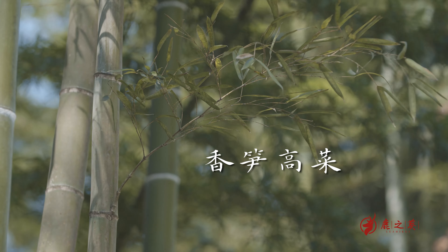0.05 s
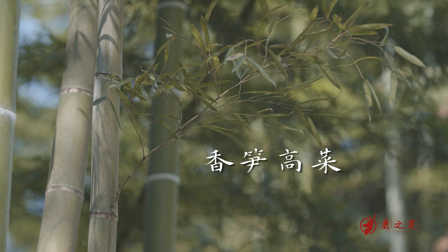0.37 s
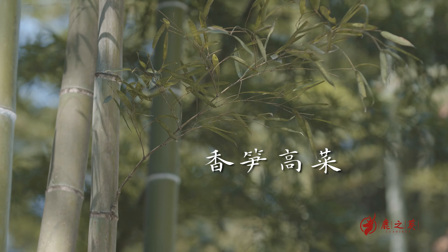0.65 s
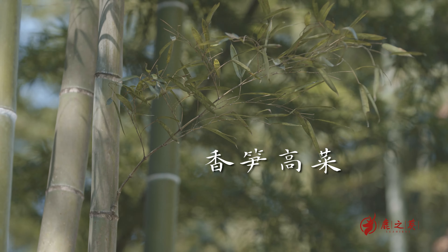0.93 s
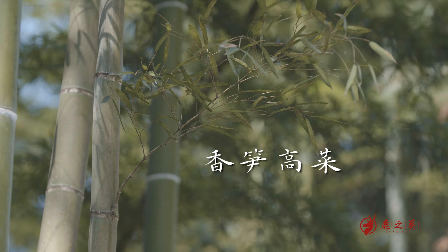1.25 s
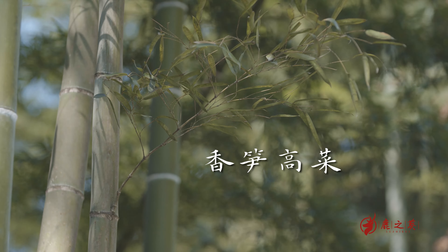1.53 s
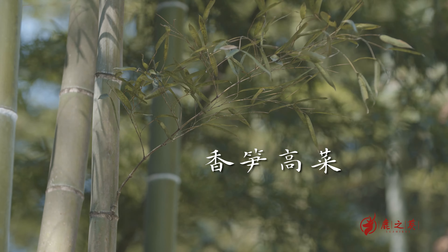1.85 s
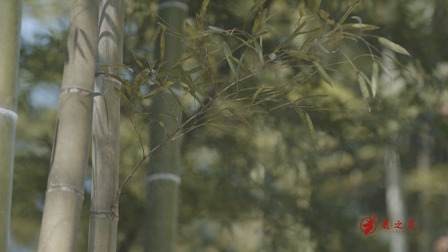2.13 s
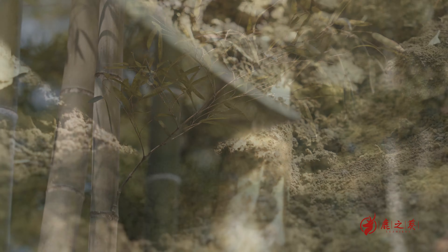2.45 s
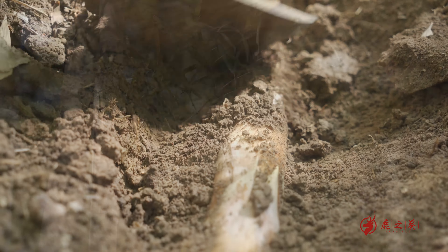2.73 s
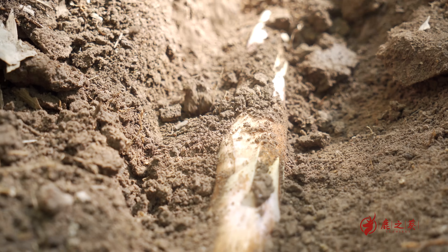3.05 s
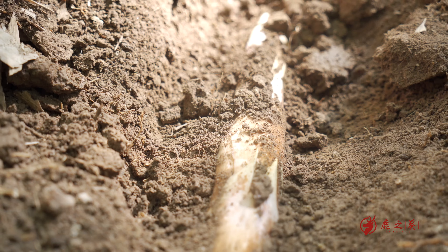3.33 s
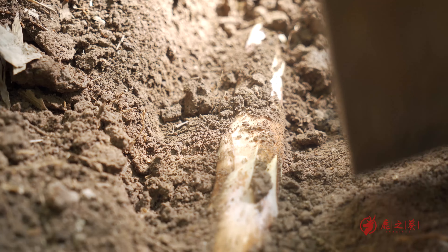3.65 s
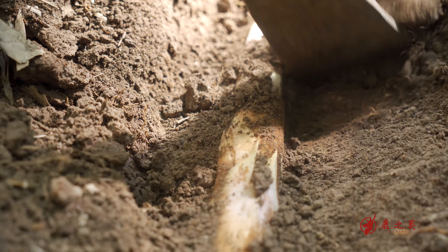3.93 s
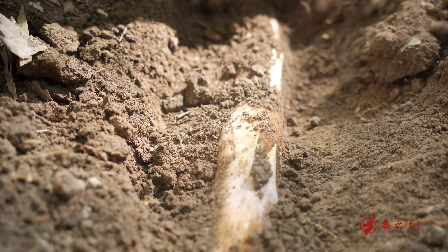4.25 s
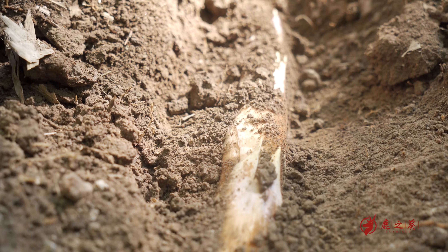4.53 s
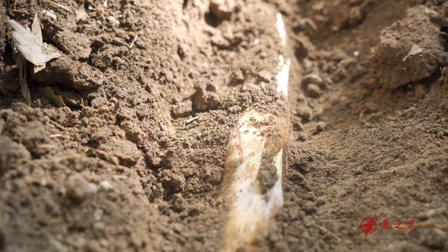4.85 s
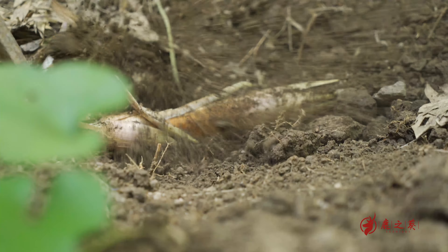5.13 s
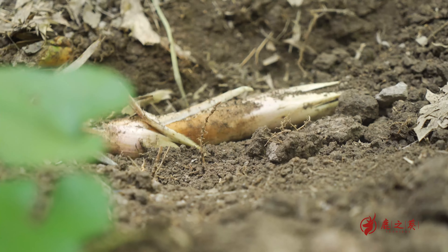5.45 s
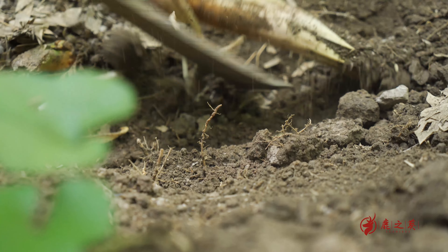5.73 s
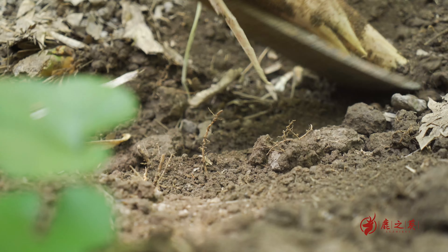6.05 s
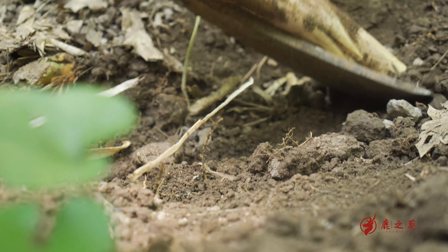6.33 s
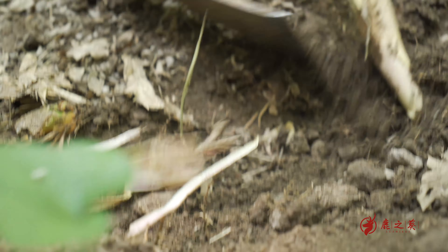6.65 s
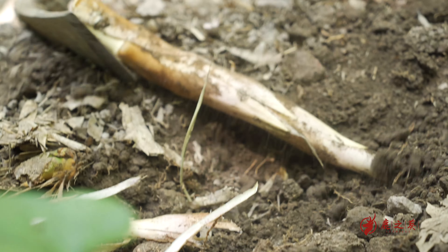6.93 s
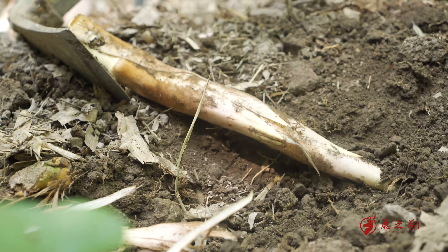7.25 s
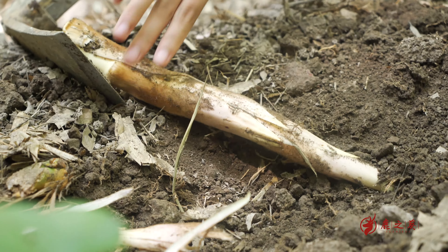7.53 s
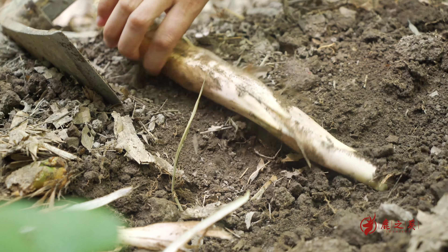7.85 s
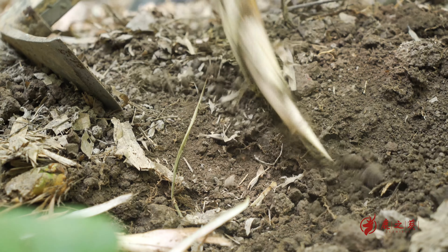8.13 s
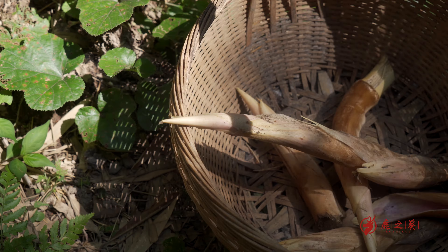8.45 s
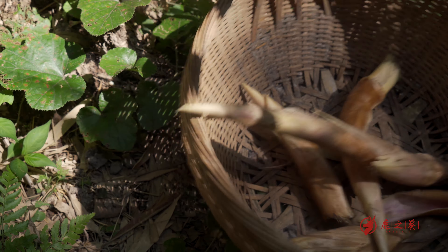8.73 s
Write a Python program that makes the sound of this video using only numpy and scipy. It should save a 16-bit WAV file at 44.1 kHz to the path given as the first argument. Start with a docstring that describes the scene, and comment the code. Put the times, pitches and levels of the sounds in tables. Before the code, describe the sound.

Close, dry digging with a hoe, with sharp crunches, a root snapping and a wicker crackle, under echoing birdsong.

```python
"""Bamboo grove: a shoot is dug up close by, over a low murmur of air and a hiss of leaves.
Songbirds whistle and twitter in near-pure tones; the stems scatter them into echoes.
A steel hoe scrapes and chops crumbly soil: runs of tiny fractures ring the blade.
The shoot snaps off its root, sheds crumbs, knocks on the blade and drops into a wicker basket."""
import sys
import numpy as np
from scipy import signal
from scipy.fft import rfft, irfft, next_fast_len
from scipy.io import wavfile
from scipy.ndimage import uniform_filter1d, map_coordinates

SR = 44100
rng = np.random.default_rng(int(sys.argv[2]) if len(sys.argv) > 2 else 0)


def wrap_up_sound(samples):
    """Save the sound to the file named by the first command line argument, as 16-bit audio."""
    columns = np.atleast_2d(samples).T
    # keep every value between -1 and 1, then stretch to whole-number steps
    tamed = np.clip(columns, -1, 1)
    steps = np.round(tamed * 32767).astype(np.int16)
    wavfile.write(sys.argv[1], SR, steps)


N = 391608

# noise spectra: f/Hz, relative density/dB
MURMUR_SPECTRUM = [(15, -33), (25, -16), (109, -3), (186, -4.5), (225, -3), (262, -5), (384, -5.5),
                   (655, -8.5), (707, -8.5), (2400, -18.5), (3120, -30), (5280, -120)]
LEAF_SPECTRUM = [(100, -38.5), (1000, -14.5), (2500, 6), (5000, -2.5), (8000, -7.5), (12000, -17),
                 (16000, -23.5)]
FIZZ_SPECTRUM = [(3000, -38), (5000, -12), (7600, -10), (8600, -1), (9800, -11.5), (13000, -12),
                 (16000, -15)]
SOIL_SPECTRUM = [(60, -6), (250, -2), (600, -2), (2000, 3.5), (4000, -1.5), (8000, -5.5), (11000, -11.5),
                 (16000, -13)]
# background envelopes: t/s, relative level/dB
MURMUR_LEVELS = [(0.0, -64.5), (2.15, -56), (8.87, -57)]
LEAF_LEVELS = [(0, -72), (.6, -67), (1.5, -66), (2.1, -63), (2.4, -56), (4.7, -59.5), (5.9, -59.5),
               (7.2, -57.5), (8.88, -63)]
# long whistles: t/s, length/s, first f/Hz, middle f/Hz, last f/Hz, held level/dB
WHISTLES = [(1.571, 0.2596, 3235, 3152, 3127, -46.5), (3.6, 0.41, 3310, 3229, 3160, -50.5),
            (3.875, .33, 3090, 2990, 3100, -53), (4.259, 0.367, 3701, 3610, 3600, -49.5),
            (6.881, .335, 3120, 2987, 2917, -42.5), (7.463, .365, 3556, 3752, 3760, -42)]
# short held notes: t/s, length/s, f/Hz, level/dB
PIPS = [(-.03, .11, 3220, -54.5), (0.378, 0.085, 2945, -51.5), (0.579, 0.069, 3360, -59),
        (0.628, .086, 3675, -54.5), (.93, .08, 3300, -63), (1.009, 0.088, 3740, -59),
        (1.829, 0.094, 3123, -52.5), (2.111, 0.16, 2563, -45.5), (4.765, 0.12, 3660, -50.5),
        (4.887, .076, 2967, -49.5), (4.967, 0.14, 3299, -53), (7.328, 0.15, 2369, -56),
        (7.451, 0.087, 3115, -50), (7.539, 0.083, 2805, -49.5), (7.634, .075, 2395, -53),
        (7.677, 0.0393, 2020, -59), (8.007, .05, 5410, -65), (8.095, 0.065, 4767, -57),
        (8.149, .1, 4184, -49.5)]
# quick sweeps: t/s, length/s, first f/Hz, last f/Hz, level/dB
SLURS = [(.178, 0.036, 2170, 4100, -57.5), (.217, 0.07, 4400, 2240, -54.5), (0.28, .093, 3620, 3327, -60.5),
         (0.349, 0.035, 2310, 3005, -51.5), (.54, 0.02, 5550, 5050, -71), (.544, .02, 3957, 3650, -64.5),
         (0.727, .02, 5550, 5100, -69), (.731, 0.031, 2380, 3435, -57), (1.921, 0.079, 3200, 2930, -47.5),
         (1.975, 0.041, 3050, 2330, -47), (2.013, 0.082, 3200, 3840, -57), (2.302, .067, 3080, 2950, -54),
         (4.677, .071, 3220, 4208, -50), (4.726, 0.065, 4400, 3970, -48.5),
         (7.068, 0.128, 4200, 3700, -62.5), (7.96, 0.041, 3300, 4950, -53.5),
         (8.429, 0.041, 3870, 3340, -57.5)]
# stock calls: (length/s, first f/Hz, middle f/Hz, last f/Hz), repeats (t/s, level/dB)
TSIP, TSIPS = (.034, 5400, 6050, 6200), [(7.14, -65), (7.6, -63), (8.352, -61)]
ARCH, ARCHES = (0.0455, 2100, 3110, 2490), [(8.483, -54.5), (8.656, -56), (8.828, -55.5)]
# twitter spells: start t/s, end t/s, low f/Hz, high f/Hz, relative level/dB
TWITTERS = [(0.201, 1.1, 2740, 3683, -66.5), (7.197, 8.3, 2262, 3202, -60), (7.953, 8.45, 4400, 5540, -69)]
# echo decay, stems near the birds and far off: f/Hz, t60/s
NEAR_STEMS = [(300, .1), (3000, 0.11), (14000, 0.033)]
FAR_STEMS = [(300, 0.43), (3000, 3.3), (6000, 0.38), (14000, 0.63)]
# blade strokes: t/s, push/s, settling to -20 dB/s, peak/dB, build-up/dB, grit over crunch/dB
STROKES = [(2.16, .1, 0.3, -60, 6, 5.5), (2.52, 0.35, 0.1363, -48, 5.5, -0.5),
           (2.92, 0.1646, 0.1, -42.5, 11.5, 0), (3.169, 0.027, 0.28, -45.5, 15, 1.5),
           (3.55, 0.04, 0.2, -51, 2, 1), (3.78, 0.14, 0.25, -41, 15, -3), (4.15, 0.05, 0.22, -43, 15, 1.5),
           (4.29, 0.14, 0.27, -49, 9, -4.5), (4.83, .02, 0.37, -56.5, 2.5, 2.5),
           (5.085, 0.034, 0.76, -57, -4.5, 2), (5.6, 0.265, .04, -53, 8.5, 3),
           (6, 0.14, 0.33, -48, 4.5, 0.5), (6.505, 0.046, 0.15, -49, 6, -2.5),
           (6.73, 0.024, 0.6, -62.5, -7, 3.5), (6.93, 0.0275, 0.05, -55.5, 9, 2)]
# thud, crunch and grit bands: low f/Hz, high f/Hz
BURST_BANDS = [(200, 1200), (1200, 4500), (4500, 15500)]
# fracture bursts: t/s, length/s, thud level/dB, crunch level/dB, grit level/dB
CLOD_CHOPS = [(2.236, 0.0319, -48.5, -56, -37), (2.432, 0.0086, -46, -41, -41.5),
              (2.515, 0.0193, -54, -44, -42.5), (2.57, 0.0084, -37, -38.5, -43),
              (2.591, 0.0073, -37, -40.5, -37.5), (2.695, 0.0067, -55, -42.5, -57),
              (2.79, 0.0183, -45, -41, -41.5), (2.832, .008, -48.5, -37, -42),
              (2.86, 0.0096, -38.5, -40, -31), (3.018, 0.019, -50, -37.5, -46),
              (3.0825, .0027, -36, -16.5, -28.5), (3.087, 0.0031, -33, -20.5, -27),
              (3.13, 0.0034, -33, -40, -45), (3.136, 0.00524, -37, -27.5, -36.5),
              (3.16, 0.0081, -53, -48, -34), (3.206, 0.0075, -40.5, -36, -35.5),
              (3.55, 0.01065, -39.5, -46, -34), (3.604, 0.011, -36.5, -52, -36.5),
              (3.743, .0044, -41, -35.5, -35), (3.793, 0.005, -49, -42, -47),
              (3.89, 0.015, -40.5, -31.5, -35.5), (4.029, 0.0072, -45, -35.5, -42.5),
              (4.222, .009, -47, -36, -33.5), (4.27, 0.0135, -47.5, -41.5, -33.5),
              (4.363, .0023, -37, -27.5, -32), (4.3745, 0.0037, -41.5, -23.5, -29),
              (4.411, 0.0311, -47.5, -42, -38), (4.488, 0.0082, -46.5, -51, -61),
              (4.524, 0.0059, -43.5, -36.5, -47), (4.826, 0.0099, -45, -43, -36),
              (4.936, 0.018, -57, -59, -48), (6.016, 0.0089, -54, -44.5, -39.5),
              (6.15, 0.0213, -63, -39, -49), (6.24, 0.025, -54, -49, -61), (6.507, 0.035, -56, -44, -62.5),
              (6.951, 0.019, -49.5, -41, -51.5)]
ROOT_SNAP = [(5.07, 0.0084, -33, -26, -22.5), (5.0795, 0.0026, -31, -16, -47)]
SHOOT_KNOCKS = [(5.247, 0.0043, -46.5, -35.5, -64), (5.256, 0.0047, -42, -36.5, -60.5),
                (5.414, 0.0047, -68, -37.5, -46.5), (5.422, 0.013, -67.5, -42, -58),
                (5.563, 0.01, -50, -28, -49.5), (5.604, 0.0056, -55, -44.5, -53.5),
                (5.864, 0.0068, -51.5, -26.5, -40.5), (5.871, 0.0123, -41.5, -39, -53),
                (6.399, 0.012, -51.5, -47.5, -62), (6.425, 0.0031, -50, -38, -55),
                (6.777, 0.0072, -69.5, -45, -61.5)]
BASKET_CRUNCHES = [(8.676, 0.0032, -80, -47.5, -59), (8.768, 0.0056, -51, -49, -40),
                   (8.7725, 0.0027, -50, -31.5, -31.5), (8.778, 0.0209, -49, -44, -43),
                   (8.8125, 0.0089, -37.5, -36, -30.5), (8.8225, 0.00085, -32, -19.5, -23),
                   (8.825, 0.0098, -43, -52, -42), (8.84, 0.012, -55, -49, -48)]
# body resonances: nominal f/Hz, width/Hz, nominal gain/dB
HOE_MODES = [(720, 110, 0), (1230, 70, 0), (1570, 70, 3), (2020, 90, 3), (2340, 110, 2), (3300, 160, 4),
             (4010, 130, 5), (5600, 200, 10), (6080, 100, 2), (6810, 80, 3), (7290, 90, 3), (7780, 80, 3),
             (9420, 90, 6), (10170, 90, 15), (12100, 180, 8), (13300, 160, 6), (14200, 100, 7)]
ROOT_MODES = [(1860, 420, 7.5), (3170, 254, 14.4), (5400, 157, 3.2), (6730, 255, 6.8)]
SHOOT_MODES = [(1290, 110, 4), (1730, 100, 18), (2150, 200, 4), (3310, 160, 13), (5400, 180, 8),
               (6830, 160, 7), (10250, 250, 3)]
WICKER_MODES = [(750, 190, 1.6), (1320, 186, 4.2), (1820, 66, 4.1), (2894, 570, 8.4), (4020, 270, 2.9)]
# blade springs free: t/s, base level/dB, pitch ratio, tilt/(dB/octave)
CLANGS = [(2.241, -48.5, 1.02, 3.5), (3.55, -48, 1.055, 2.5), (3.604, -44.5, 1, -0.5),
          (4.828, -50, 1.08, 1), (6.507, -47, 1.003, 0.5), (6.742, -56.5, 1.23, 3.5),
          (6.951, -55, 1.01, -1)]
# free blade modes: nominal f/Hz, relative level/dB, t60/s
FREE_BLADE_MODES = [(1215, 9, 0.16), (2270, 0.5, .22), (4700, 1.5, 0.27), (5700, -16, 0.093),
                    (6200, -3, 0.154), (7780, -4.5, 0.44), (9300, -7.5, 0.44), (11920, -12, 0.44)]


def amp(db):
    """dB to gain."""
    return 10 ** (np.asarray(db) / 20)


def unit(x):
    """Scale to rms 1."""
    return x / np.sqrt(np.mean(x ** 2) + 1e-20)


def along(points, hz):
    """Interpolate (f/Hz, value) points over log f."""
    f, v = np.transpose(points)
    return np.interp(np.log(hz + 1), np.log(f + 1), v)


def curve(points):
    """Interpolate (t/s, value) points per sample."""
    return np.interp(np.arange(N) / SR, *np.transpose(points))


def gate(start_s, end_s, fade_s):
    """1 from start to end, linear fades."""
    t = np.arange(N) / SR
    return np.clip(np.minimum(t - start_s, end_s - t) / fade_s + .5, 0, 1)


def wobble(rate_hz, size=N):
    """Smooth curve through random knots."""
    knots = rng.standard_normal(int(size * rate_hz / SR) + 4)
    return map_coordinates(knots, [np.arange(size) * rate_hz / SR])


def add(track, at_s, x):
    """Mix x into the track."""
    i = round(at_s * SR)
    x = x[max(-i, 0):max(N - i, 0)]
    track[max(i, 0):][:len(x)] += x


def filtered(x, response):
    """FFT filter, gain = response(f/Hz)."""
    size = next_fast_len(len(x) + 4096)
    return irfft(rfft(x, size) * response(np.fft.rfftfreq(size, 1 / SR)), size)[:len(x)]


def coloured(x, spectrum):
    """Shape by a spectrum, rms 1."""
    return unit(filtered(x, lambda hz: amp(along(spectrum, hz))))


def band(x, edges_hz):
    """Causal band-pass."""
    return signal.sosfilt(signal.butter(3, edges_hz, 'band', fs=SR, output='sos'), x)


def air():
    """Low murmur and faint leaf hiss; a thin high fizz sets in with the digging."""
    murmur = coloured(rng.standard_normal(N), MURMUR_SPECTRUM)
    murmur *= amp(curve(MURMUR_LEVELS) + 1.5 + 0.51 * wobble(3.78))
    leaves = coloured(rng.standard_normal(N), LEAF_SPECTRUM)
    leaves *= amp(curve(LEAF_LEVELS) + 1.1 * wobble(1.906))
    fizz = coloured(rng.standard_normal(N), FIZZ_SPECTRUM) * amp(-66.5) * gate(2.2, 9, fade_s=0.13)
    return murmur + leaves + fizz


def glide(length_s, pitches_hz):
    """Parabola through first, middle and last pitch."""
    return np.polyval(np.polyfit([0, .5, 1], pitches_hz, 2), np.linspace(0, 1, int(length_s * SR)))


def tone(hz, waver, flutter_db):
    """Near-pure bird tone, unsteady in pitch and level."""
    phase = 2 * np.pi * np.cumsum(hz * (1 + waver * wobble(122.5, len(hz)))) / SR
    return np.sqrt(2) * np.sin(phase) * amp(flutter_db * wobble(66.5, len(hz)))


def note(length_s, pitches_hz):
    """Quick note; wider sweeps rasp more and have longer fades."""
    hz = glide(length_s, pitches_hz)
    sweep = np.ptp(hz) / np.mean(hz)
    fade = signal.windows.tukey(len(hz), min(0.279 + .35 * sweep, 1))
    return tone(hz, waver=0.0045 + 0.0619 * sweep, flutter_db=1 + 3.5 * sweep) * fade


def echo(x, decay):
    """Countless stems scatter sound into a diffuse tail."""
    hz, t, noise = signal.stft(rng.standard_normal(SR * 3 // 2), SR, nperseg=256)
    tail = signal.istft(noise * amp(-60 * t / along(decay, hz)[:, None]), SR, nperseg=256)[1]
    return signal.fftconvolve(x, tail / np.linalg.norm(tail))[:N]


def birds(swell_db=16.5, swell_share=0.476, scoop=0.013):
    """Whistles that swell then hold, pips, slurs and stock calls, echoed by the stems."""
    song = np.zeros(N)
    for at_s, length_s, *pitches_hz, db in WHISTLES:
        hz = glide(length_s, pitches_hz)
        rise_db = -swell_db * np.maximum(1 - np.linspace(0, 1, len(hz)) / swell_share, 0)
        envelope = amp(db + rise_db) * signal.windows.tukey(len(hz), .15)
        add(song, at_s, envelope * tone(hz, waver=0.0032, flutter_db=1.9))
    for at_s, length_s, hz, db in PIPS:
        add(song, at_s, amp(db) * note(length_s, [hz * (1 - scoop), hz, hz]))
    for at_s, length_s, first_hz, last_hz, db in SLURS:
        add(song, at_s, amp(db) * note(length_s, [first_hz, (first_hz + last_hz) / 2, last_hz]))
    for (length_s, *pitches_hz), repeats in [(TSIP, TSIPS), (ARCH, ARCHES)]:
        for at_s, db in repeats:
            add(song, at_s, amp(db) * note(length_s, pitches_hz))
    return song + amp(-14.5) * echo(song, NEAR_STEMS) + amp(-12) * echo(song, FAR_STEMS)


def far_birds(step_s=.065, mean_note_s=.045):
    """Loose runs of random notes, farther off, with more echo."""
    song = np.zeros(N)
    for start_s, end_s, low_hz, high_hz, db in TWITTERS:
        for at_s in np.arange(start_s, end_s, step_s):
            late, stretch, *heights = rng.random(5)
            pitches_hz = low_hz + (high_hz - low_hz) * np.array(heights)
            add(song, at_s + late * step_s / 2, amp(db) * note(mean_note_s * (.5 + stretch), pitches_hz))
    return amp(1) * song + amp(-8) * echo(song, NEAR_STEMS) + amp(-5) * echo(song, FAR_STEMS)


def grains(size, rate_hz, spread_db):
    """Tiny fractures at random times: many weak, few strong."""
    happens = rng.random(size) < rate_hz / SR
    return happens * rng.choice([-1, 1], size) * amp(spread_db * np.minimum(rng.exponential(size=size), 4))


def speckled(x, depth_db):
    """Each crumb has its own colour: random gains over time and frequency."""
    cells = signal.stft(x, nperseg=192)[2]
    field = unit(uniform_filter1d(rng.standard_normal(cells.shape), size=4, axis=0))
    return signal.istft(cells * amp(depth_db * field), nperseg=192)[1][:N]


def stroke_gains(bite_s=0.0091):
    """Crunch and grit envelopes: the blade bites and pushes, then crumbs settle."""
    crunch, grit, t = np.zeros(N), np.zeros(N), np.arange(SR) / SR
    for at_s, push_s, settle_s, peak_db, build_db, grit_db in STROKES:
        push_db = peak_db - build_db * np.maximum(1 - t / push_s, 0)
        settle_db = -20 * np.maximum(t - push_s, 0) / settle_s
        stroke = amp(push_db + settle_db) * np.minimum(t / bite_s, 1)
        add(crunch, at_s, stroke)
        add(grit, at_s, stroke * amp(grit_db))
    return crunch, grit


def hoe_scrape(clumps_per_s=27, clump_decay_s=.005, clump_db=-1):
    """Crumbs grind along the blade in clumps: coarse ones crunch, fine ones hiss."""
    crumbs = unit(grains(N, rate_hz=3000, spread_db=3.5)) + 0.36 * rng.standard_normal(N)
    onsets = rng.random(N) < clumps_per_s / SR
    clumps = signal.lfilter([1], [1, -np.exp(-1 / (clump_decay_s * SR))], onsets)
    force = coloured(speckled(crumbs * (1 + amp(clump_db) * clumps), depth_db=2.5), SOIL_SPECTRUM)
    soil, hop = np.zeros(N), SR // 20
    for i in range(2 * SR, 15 * SR // 2, hop):
        # loose crumbs ring the blade less than packed soil
        direct_db = np.interp(i / SR, [4.5, 5], [-1, 13])
        frame = np.pad(force[i:i + 2 * hop] * signal.windows.hann(2 * hop), (0, hop))
        add(soil, i / SR, unit(ring(frame, HOE_MODES, direct_db, vary=.7)))
    crunch, grit = stroke_gains()
    return unit(band(soil, (350, 4300))) * crunch + unit(band(soil, (4500, 15500))) * grit


def ring(x, modes, direct_db, vary):
    """Direct sound plus resonances; pitch and gain vary at random, as with the contact point."""
    hz, width_hz, db = np.transpose(modes)[:, :, None]
    hz = hz * (1 + .025 * vary * rng.standard_normal(hz.shape))
    gain = amp(db + 4 * vary * rng.standard_normal(hz.shape))

    def response(f):
        damping = 1j * f * width_hz
        return amp(direct_db) + np.sum(gain * damping / (hz * hz - f * f + damping), axis=0)
    return filtered(x, response)


def bursts(rows, modes, direct_db, vary, rate_hz, spread_db, release_s):
    """Quick runs of fractures ring the body they pass through."""
    track, t = np.zeros(N), np.arange(SR // 8) / SR
    for at_s, length_s, *levels_db in rows:
        attack = np.minimum(t / (0.13 * length_s), 1)
        decay = np.exp(-.7 * t / length_s - np.maximum(t - length_s, 0) / release_s)
        cracks = unit(grains(len(t), rate_hz, spread_db)) + 0.68 * rng.standard_normal(len(t))
        body = ring(coloured(cracks, SOIL_SPECTRUM) * attack * decay, modes, direct_db, vary)
        thud, crunch, grit = [unit(band(body, hz)) * amp(db) for hz, db in zip(BURST_BANDS, levels_db)]
        # adjacent bands meet in antiphase; levels are rms over length_s
        add(track, at_s, (thud - crunch + grit) * np.sqrt(length_s / t[-1]))
    return track


def hoe_chops():
    """Clods break and ring the hoe."""
    return bursts(CLOD_CHOPS, HOE_MODES, direct_db=4.5, vary=1,
                  rate_hz=4000, spread_db=4.5, release_s=0.0054)


def blade_clangs(attack_s=0.0027):
    """The freed blade rings; clinging soil detunes it and makes it waver."""
    track, t = np.zeros(N), np.arange(SR // 2) / SR
    for at_s, base_db, ratio, tilt_db in CLANGS:
        for hz, db, t60_s in FREE_BLADE_MODES:
            start_db = base_db + db + tilt_db * np.log2(hz / 4000) + rng.normal(0, 0.64)
            envelope = amp(start_db - 60 * t / t60_s) * np.minimum(t / attack_s, 1)
            phase = 2 * np.pi * hz * ratio * t + .5 * wobble(95, len(t))
            add(track, at_s, envelope * np.sin(phase))
    return track


def root_snap():
    """The root tears, then gives way."""
    return bursts(ROOT_SNAP, ROOT_MODES, direct_db=2, vary=.2,
                  rate_hz=6000, spread_db=2.5, release_s=.001)


def crumb_trickle():
    """Single crumbs drop off the husk of the lifted shoot."""
    ticks = speckled(grains(N, rate_hz=25, spread_db=3.5), depth_db=5)
    return amp(-45) * band(ticks, (2500, 15000)) * gate(5.1, 8.75, fade_s=.05)


def shoot_knocks():
    """The shoot knocks and slips against the blade."""
    return bursts(SHOOT_KNOCKS, SHOOT_MODES, direct_db=-3, vary=0.67,
                  rate_hz=2500, spread_db=2, release_s=0.0015)


def basket_drop():
    """Wicker crunches under the shoot."""
    return bursts(BASKET_CRUNCHES, WICKER_MODES, direct_db=3.5, vary=0.29,
                  rate_hz=2000, spread_db=1, release_s=0.00305)


def scene():
    """Close, dry digging under distant, echoing birds; mono."""
    impacts = hoe_chops() + root_snap() + shoot_knocks() + basket_drop()
    return (impacts + birds() + blade_clangs() + hoe_scrape() + crumb_trickle() + far_birds() + air())[None]


def record(dry):
    """Brick-wall low-pass, 16 kHz."""
    return filtered(dry[0], lambda hz: hz < 16000)[None]


dry = scene()
out = record(dry)
wrap_up_sound(out)
```